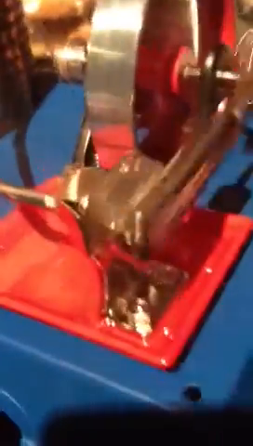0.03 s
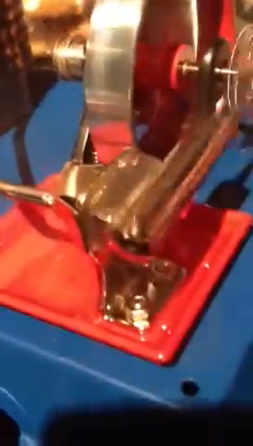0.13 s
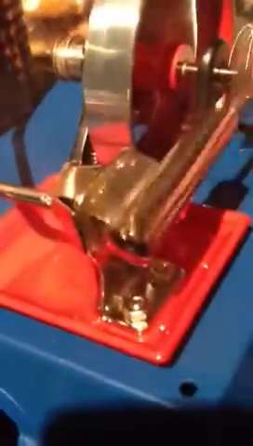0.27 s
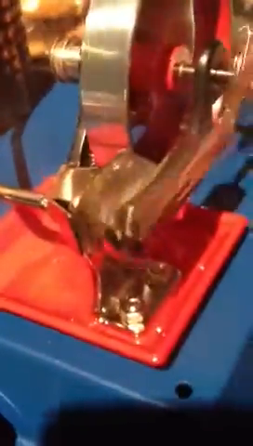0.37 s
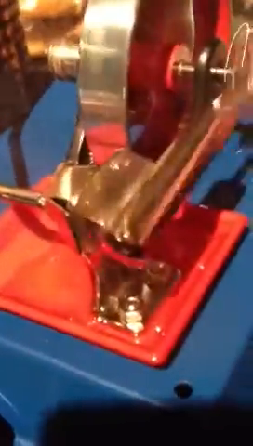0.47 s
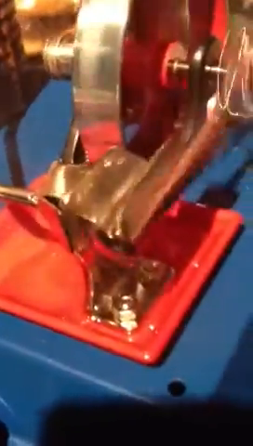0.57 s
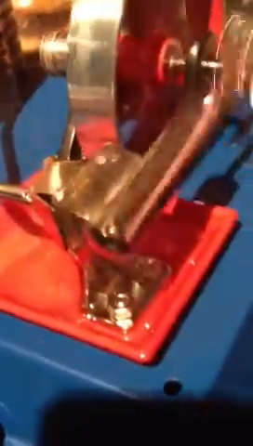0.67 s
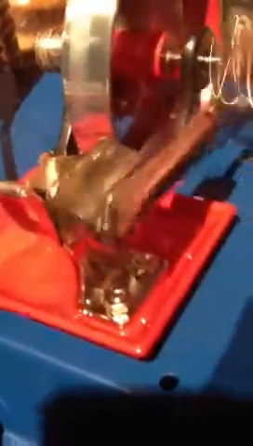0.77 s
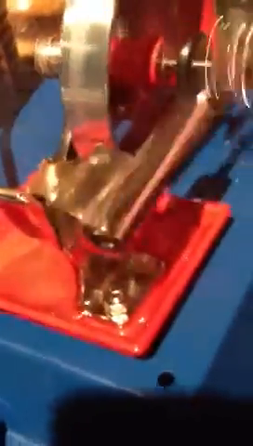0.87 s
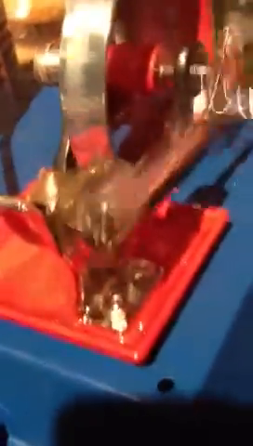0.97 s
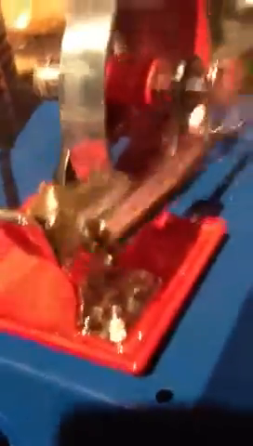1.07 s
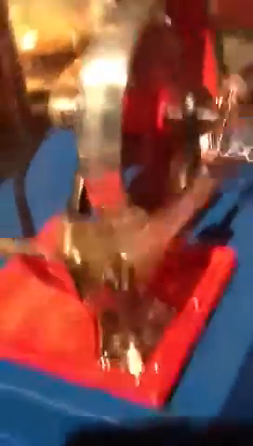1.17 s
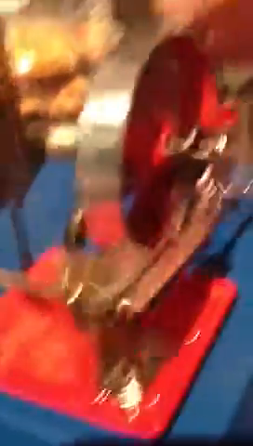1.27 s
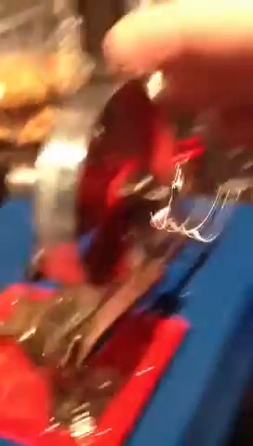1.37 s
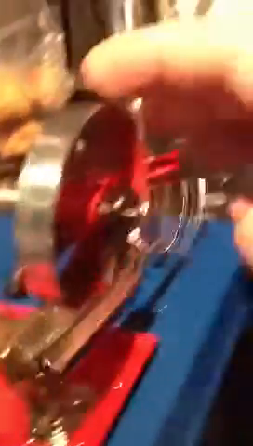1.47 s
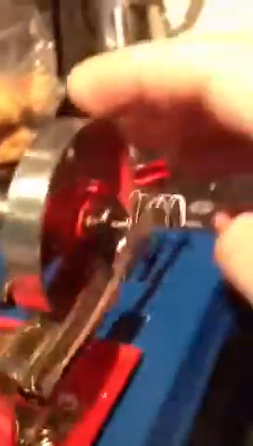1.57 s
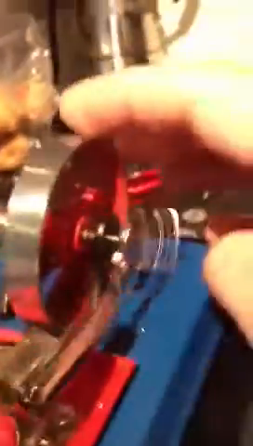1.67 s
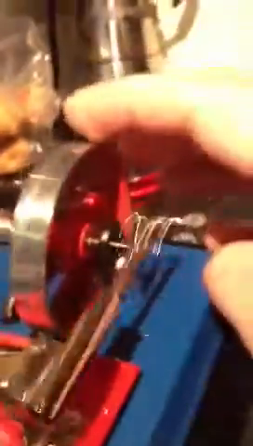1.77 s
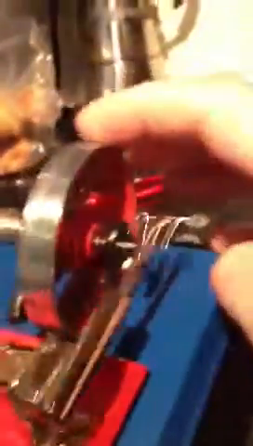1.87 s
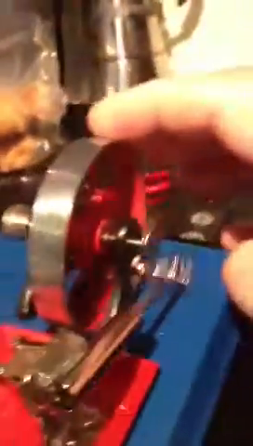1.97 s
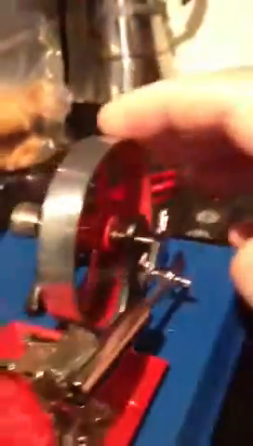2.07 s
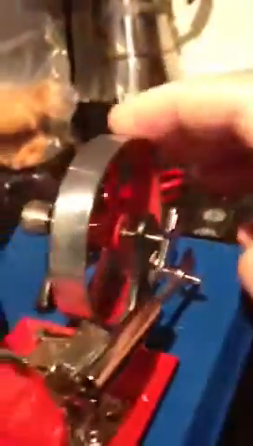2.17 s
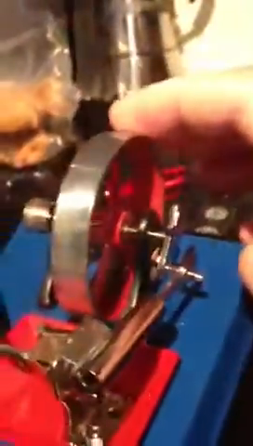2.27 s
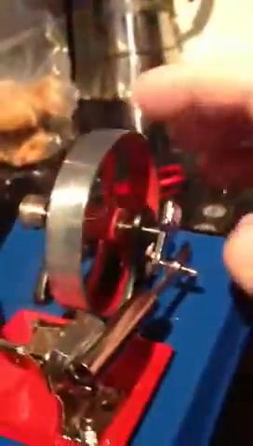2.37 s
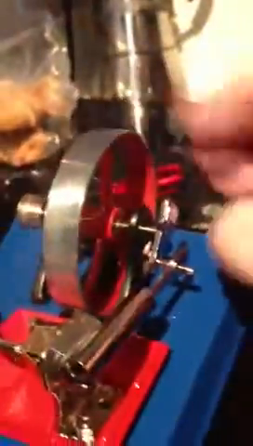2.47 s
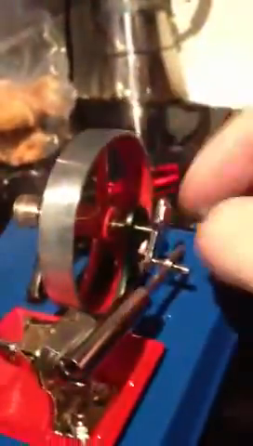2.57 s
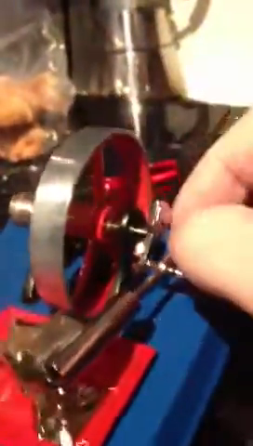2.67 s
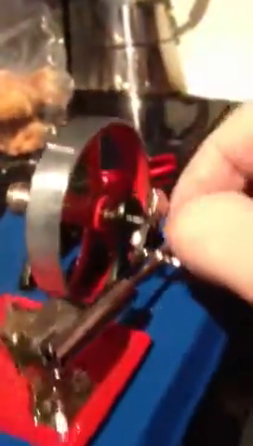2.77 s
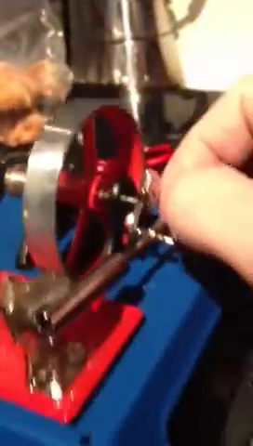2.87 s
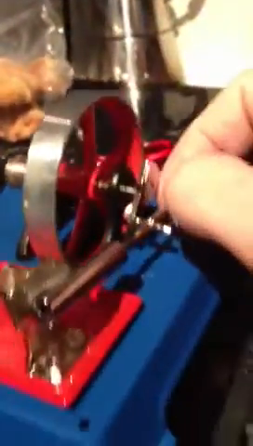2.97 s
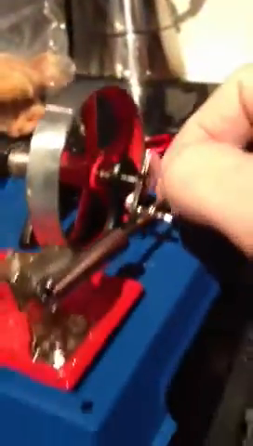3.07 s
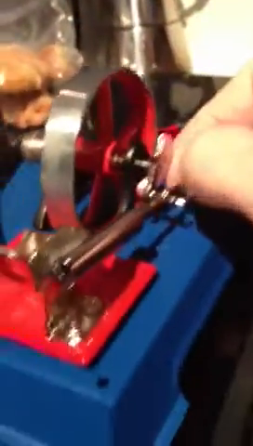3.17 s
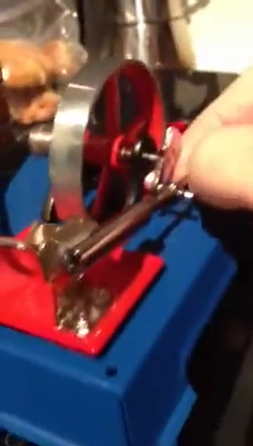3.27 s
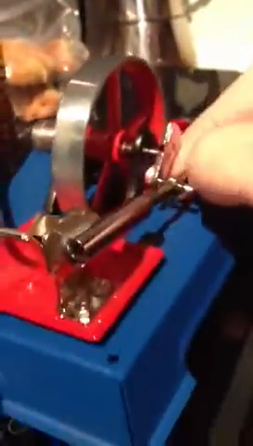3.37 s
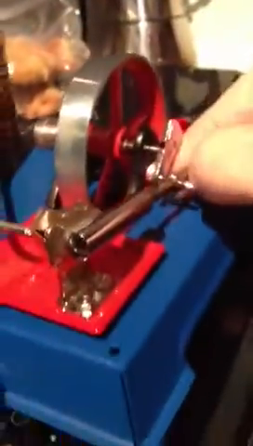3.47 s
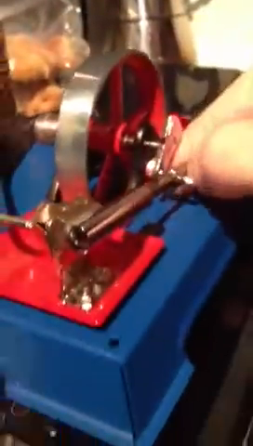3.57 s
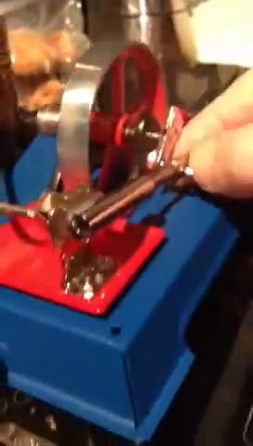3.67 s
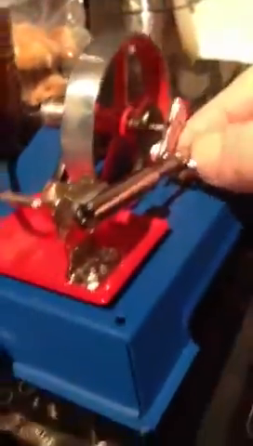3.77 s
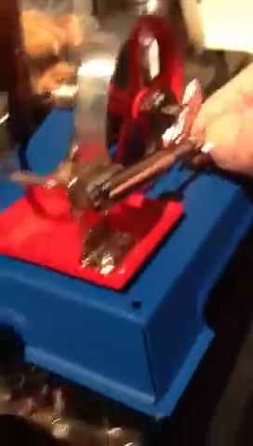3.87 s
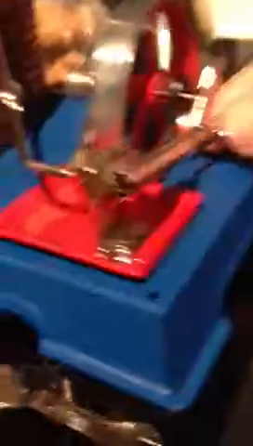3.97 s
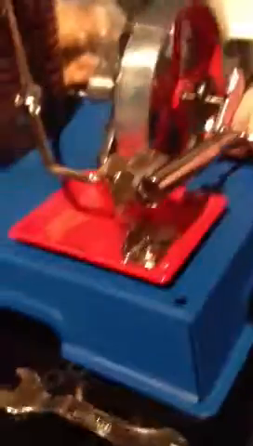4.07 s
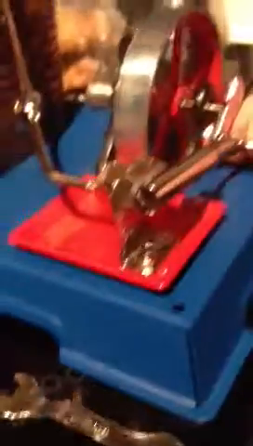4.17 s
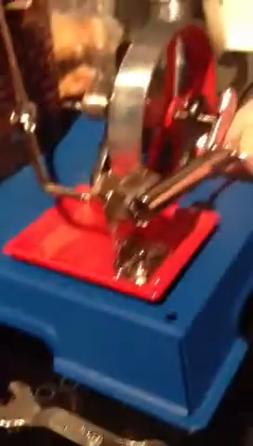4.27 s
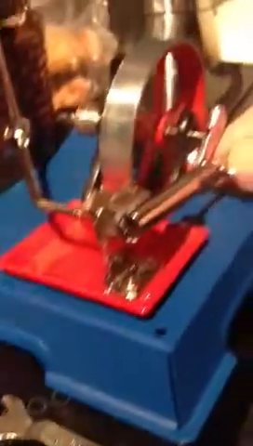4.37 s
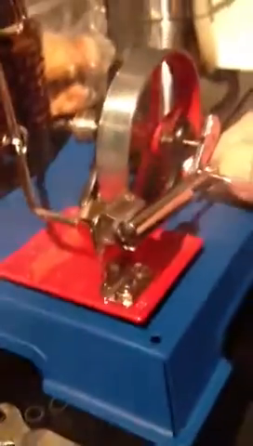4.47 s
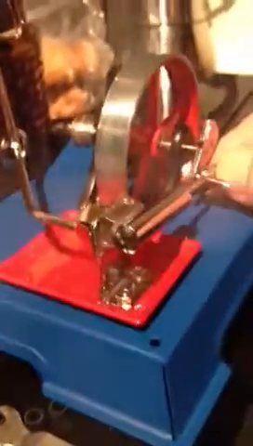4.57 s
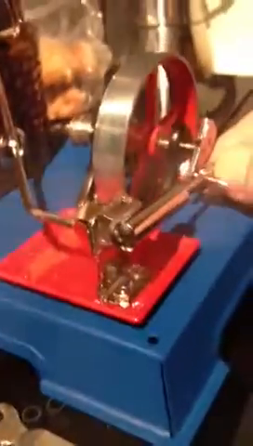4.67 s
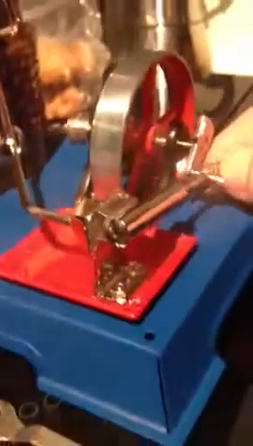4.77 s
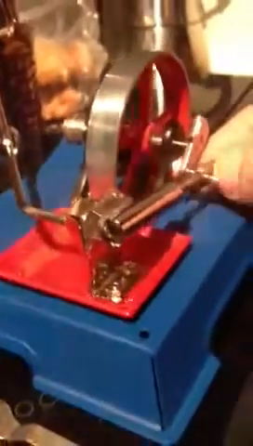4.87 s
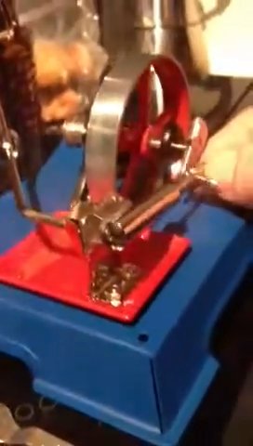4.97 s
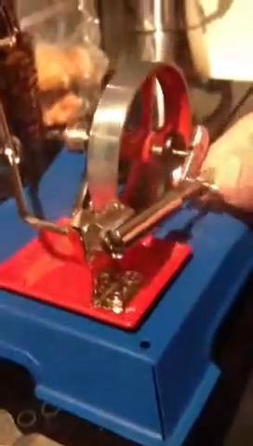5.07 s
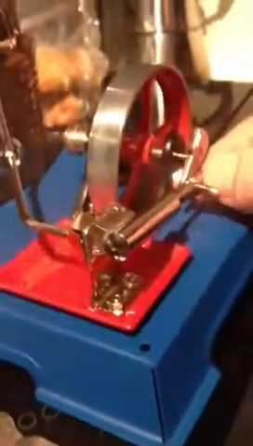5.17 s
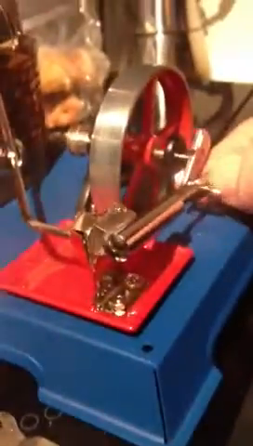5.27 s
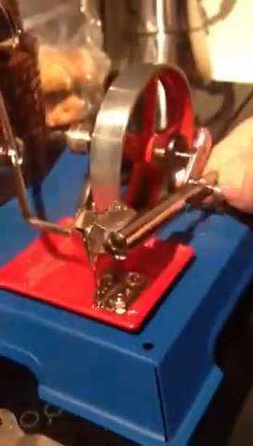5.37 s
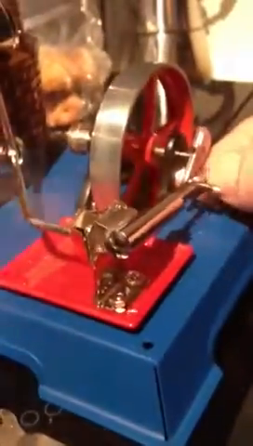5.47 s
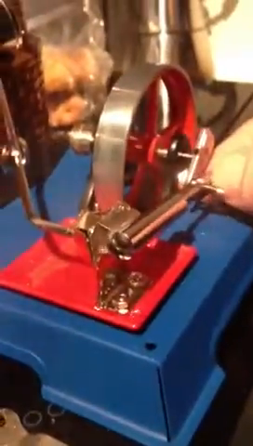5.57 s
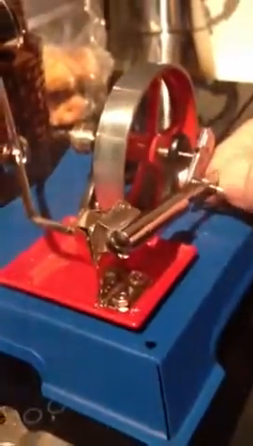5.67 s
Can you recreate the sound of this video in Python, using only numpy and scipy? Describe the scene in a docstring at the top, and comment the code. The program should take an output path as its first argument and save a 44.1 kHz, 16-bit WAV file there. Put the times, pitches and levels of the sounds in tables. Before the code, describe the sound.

A small toy steam engine runs close by, puffing rapidly with a bright, wet hiss and a metallic rattle on every turn. After about two seconds it slows slightly and stops. A few light metal taps and weak spits of steam follow over a thin leaking hiss. Near the end come four loud, sharp bursts of steam with faint clinks between them. The small room hums softly.

```python
"""In a small, humming room, a toy steam engine with an oscillating cylinder runs on its hollow base.
Each turn gives a wet exhaust puff (a turbulent jet), a rub of the piston and a rattling knock (forces
that excite the modes of the frame), until a finger brakes the flywheel to a stop. The crank is then
rocked by hand: it taps in its play, and the open port lets out bursts of spitting steam.
The engine is close by; throughout, its boiler simmers and a thin hiss seeps from the port face."""
import sys
import numpy as np
from scipy import signal
from scipy.fft import rfft, irfft, next_fast_len
from scipy.io import wavfile
from scipy.ndimage import uniform_filter1d, map_coordinates

SR = 44100
rng = np.random.default_rng(int(sys.argv[2]) if len(sys.argv) > 2 else 0)


def persist_wave(psi):
    """Save psi, clipped to +-1, as 16-bit WAV."""
    counts = np.round(np.clip(psi, -1, 1) * 32767).astype(np.int16)
    wavfile.write(sys.argv[1], SR, np.atleast_2d(counts).T)


N = 252693


def amp(db):
    """Decibels as an amplitude ratio."""
    return 10 ** (np.asarray(db) / 20)


def unit(x):
    """Normalisation to rms 1."""
    return x / np.sqrt(np.mean(x ** 2) + 1e-20)


def along(points, hz):
    """Interpolation of (frequency_hz, value) points on a logarithmic frequency axis."""
    f, values = np.transpose(points)
    return np.interp(np.log(hz + 1), np.log(f + 1), values)


def clock():
    """The time of every sample in seconds."""
    return np.arange(N) / SR


def wobble(rate):
    """Smooth random modulation: a spline through `rate` knots a second."""
    knots = rng.standard_normal(int(N * rate / SR) + 4)
    smooth = map_coordinates(knots, [np.arange(len(knots) * 10) / 10])
    return np.interp(clock() * rate * 10, np.arange(len(smooth)), smooth)


def gate(start, end, rise, fall):
    """An envelope at 1 from start to end, with exponential flanks (time constants in seconds)."""
    rise, fall, opening = max(rise, 1e-4), max(fall, 1e-4), np.zeros(N)
    span = np.arange(max(int((start - 10 * rise) * SR), 0), min(int((end + 10 * fall) * SR), N))
    t = span / SR
    opening[span] = np.exp(-np.maximum(start - t, 0) / rise - np.maximum(t - end, 0) / fall)
    return opening


def filtered(x, response):
    """Linear filtering: the spectrum of x times a frequency response."""
    size = next_fast_len(N + SR // 2)
    return irfft(rfft(x, size) * response(np.fft.rfftfreq(size, 1 / SR)), size)[:N]


def crossover(low, high, split_hz):
    """Complementary filters join the bass of one signal to the treble of another."""
    return high + filtered(low - high, lambda f: 1 / (1 + (f / split_hz) ** 8))


def resonances(modes, f):
    """Modal superposition: the summed response of damped (pitch_hz, width_hz, gain_db) resonators."""
    return sum(amp(db) * 1j * f * width / (hz * hz - f * f + 1j * f * width) for hz, width, db in modes)


def narrow_noise(hz, width_hz):
    """Narrow-band noise of rms 1: white noise passed twice through one resonator."""
    return unit(filtered(rng.standard_normal(N), lambda f: resonances([(hz, width_hz, 0)], f) ** 2))


def grains(rate, share):
    """Shot noise of `rate` ticks a second carries a share of the power, Gaussian noise the rest."""
    ticks = rng.uniform(-0.96, 1, N) * (rng.random(N) < rate / SR)
    return np.sqrt(share) * unit(ticks) + np.sqrt(1 - share) * rng.standard_normal(N)


def patchy(x, depth_db):
    """Spectral modulation: random gains in patches a few hundred hertz wide and about a stroke long."""
    spectrogram = signal.stft(x, nperseg=512)[2]
    field = uniform_filter1d(rng.standard_normal(spectrogram.shape), 4, axis=0)
    field = uniform_filter1d(field, 14, axis=1)
    return unit(signal.istft(spectrogram * amp(depth_db * unit(field)), nperseg=512)[1][:N])


# Partials of the room's hum: pitch_hz, relative_level_db
HUM_PARTIALS = [(193.8, -53), (269.2, -60), (489.9, -63)]
def room_hum():
    """Phase and amplitude modulation make three low tones waver."""
    hum = np.zeros(N)
    for hz, db in HUM_PARTIALS:
        tone = np.sin(2 * np.pi * hz * clock() + 0.6 * wobble(12))
        hum += amp(db + 0.5) * unit(tone * amp(2.9 * wobble(7)))
    return hum


# Spectrum of the room's noise: frequency_hz, relative_level_db
RUSH_SPECTRUM = [(25, -52), (60, -46), (100, -14), (150, -8), (190, -1.5), (230, -4), (295, 3.5),
                 (420, -13.5), (600, -9.5), (880, -12.5), (1000, -19.5), (1300, -14), (2600, -21.5),
                 (6000, -45)]
def room_rush():
    """Stationary noise, weighted to low frequencies, is heard as a soft rush."""
    return amp(-48) * unit(filtered(rng.standard_normal(N), lambda f: amp(along(RUSH_SPECTRUM, f))))


# Reverberation time of the room: frequency_hz, t60_s
ROOM_DECAY = [(200, 0.5), (2000, 0.25), (12000, 0.12)]
def reverberation(x):
    """The diffuse field of a small room decays exponentially, faster in the treble."""
    hz, t, spectrogram = signal.stft(rng.standard_normal(SR // 3), SR, nperseg=256)
    decay = amp(-60 * t / along(ROOM_DECAY, hz)[:, None])
    tail = signal.istft(spectrogram * decay, SR, nperseg=256)[1]
    return signal.fftconvolve(x, np.pad(tail / np.linalg.norm(tail), (SR // 300, 0)))[:N]


def early_reflections(x):
    """Comb filtering: echoes from base plate, boiler and table interfere with the direct sound."""
    echoes = [(.0011, -67), (.0029, -33.5), (.0043, -18), (.0062, -23)]  # delay_s, relative_level_db
    reflected = lambda f: sum(amp(db) * np.exp(-2j * np.pi * f * delay) for delay, db in echoes)
    return filtered(x, lambda f: unit(1 + reflected(f)))


# Modes of the frame and hollow base: pitch_hz, width_hz, relative_gain_db
FRAME_MODES = [(256.3, 11.6, -4), (491.3, 17, -6), (595, 34, -8), (721, 29, 1.5), (812, 65, -1.5),
               (910, 77, -14.5), (1132, 95, 2.5), (1289, 42, 3), (1482, 76, -3.5), (1729, 81, 1),
               (1940, 54, -5), (2107, 210, -11), (2266, 73, -8.5), (2645, 65, -8.5), (3060, 270, -15.5),
               (3390, 180, -4.5), (3714, 216, -4), (4040, 140, -6.5), (4275, 200, -6.5), (4554, 190, -5),
               (4780, 28, -34), (6310, 102, -1.5), (6760, 210, -10), (7350, 92, -21), (8100, 270, -27),
               (7700, 230, -12.5)]
# How strongly they radiate: frequency_hz, relative_gain_db
FRAME_RADIATION = [(50, 2), (130, -9), (250, 6), (400, 1.5), (1100, 1), (1800, 1.5), (5000, 2), (5800, 2.5),
                   (8500, 3.5), (9800, -6.5), (12000, -6), (15000, -27)]
def frame(force, bright, split_hz):
    """Forced vibration: `force` drives the frame's modes below the split, `bright` those above."""
    response = lambda f: unit(resonances(FRAME_MODES, f) * amp(along(FRAME_RADIATION, f)))
    return filtered(crossover(force, bright, split_hz), response)


def boiler_simmer():
    """Structure-borne sound: the simmering boiler weakly excites the frame."""
    simmer = grains(rate=150, share=.4) * amp(2.2 * wobble(9))
    return amp(-58.5) * frame(simmer, amp(-24.5) * simmer, split_hz=3000)


# Resonances around port and cylinder: pitch_hz, width_hz, gain_db
PORT_MODES = [(3170, 400, -7.5), (4560, 610, -8), (5970, 780, -9), (8080, 210, -10), (9550, 230, -18),
              (12000, 140, -31), (12000, 190, -15)]
def steam(spectrum, spit_rate, spit_share):
    """Jet noise of rms 1: turbulence and bursting droplets, coloured by the port's resonances."""
    colour = lambda f: amp(along(spectrum, f)) * (1 + resonances(PORT_MODES, f))
    return unit(filtered(grains(spit_rate, spit_share), colour))


# Strength of the leak at the port face: time_s, level_db
LEAK_LEVELS = [(0, -68.5), (1.9, -48), (2.05, -51.5), (4.05, -50), (4.22, -42), (4.31, -45), (4.38, -39),
               (4.8, -49), (5.73, -49)]
# Spectrum of seeping steam: frequency_hz, relative_level_db
SEEP_SPECTRUM = [(1000, -17.5), (4000, -5), (5400, -9), (7500, -3), (10500, -4), (11900, 2), (13000, -2),
                 (13700, -6), (15300, -4)]
# Squeaks of wet steam in the gap: start_s, length_s, start_hz, end_hz, level_db
GAP_SQUEAKS = [(3.9, .025, 12200, 11850, -56), (4.195, .06, 11300, 12450, -53)]
def port_leak():
    """Flow through a narrow gap hisses; it squeaks and whistles faintly as the gap widens."""
    level_db = np.interp(clock(), *np.transpose(LEAK_LEVELS))
    hiss = amp(level_db + 0.46 * wobble(14)) * steam(SEEP_SPECTRUM, spit_rate=1300, spit_share=.08)
    squeaks = np.zeros(N)
    for start, length, start_hz, end_hz, db in GAP_SQUEAKS:
        pitch_hz = np.interp(clock(), [start, start + length], [start_hz, end_hz]) + 60 * wobble(150)
        tone = np.sin(2 * np.pi * np.cumsum(pitch_hz) / SR)
        squeaks += amp(db) * gate(start, start + length, rise=.005, fall=.005) * tone
    whistle = amp(-61) * gate(3.83, 4.3, rise=0.061, fall=0.032) * narrow_noise(hz=2550, width_hz=420)
    return hiss + squeaks + whistle


def bearing_rumble():
    """Bearing friction: the flywheel's shaft rumbles until it is braked."""
    rolling = gate(0, 1.89, rise=.01, fall=0.13) * grains(rate=460, share=0.13)
    # frequency_hz, relative_level_db
    spectrum = [(25, -19), (80, -34), (160, -5), (280, -7.5),
                (420, -11.5), (780, -9), (1500, -7), (4000, -21)]
    return amp(-37.5) * filtered(rolling, lambda f: unit(amp(along(spectrum, f))))


def frame_ping():
    """Free vibration: a light tap leaves the frame ringing briefly on one faint, high note."""
    start_s, pitch_hz, level_db, t60_s = 2.62, 1916, -45, .15
    age = np.maximum(clock() - start_s, 0)
    return amp(level_db - 60 * age / t60_s) * np.sin(2 * np.pi * pitch_hz * age)


# The wheel stalls, then fingers nudge it and the crank:
# start_s, relative_level_db, relative_treble_db, length_s
TOUCHES = [(2, -23.5, -18, .012), (2.067, -31, -12, .006), (2.141, -40, 0, .0069), (2.49, -36, -32, .022),
           (2.615, -34, -7, 0.011), (2.726, -33.5, -10.5, 0.012), (3.088, -39, -32, 0.058),
           (3.277, -22, -18, 0.0094), (3.51, -29.5, -17, .003)]
def finger_taps():
    """Contact excitation: each light touch is a brief scrape that rings the frame."""
    force, bright = np.zeros((2, N))
    for start, db, treble_db, length in TOUCHES:
        touch = amp(db - 14) * gate(start + 0.00067, start + length, rise=0.0017, fall=0.01)
        force += touch
        bright += touch * amp(min(treble_db + 5, 0))
    contact = grains(rate=820, share=1.0)
    return frame(force * contact, bright * contact, split_hz=3000)


# The rocked crank reaches the end of its play: start_s, relative_level_db
CRANK_IMPACTS = [(4.751, -32), (4.813, -44.5), (5.06, -30.5), (5.143, -34.5), (5.42, -27)]
# Modes of the piston rod and cylinder: pitch_hz, relative_level_db, t60_s
ROD_MODES = [(1098, -10, 0.15), (1149, -4, 0.061), (1300, -7, 0.093), (1770, -16, 0.033), (4650, 1, .03),
             (4700, -10, .035)]
def crank_clinks():
    """Backlash impact: the crank pin ticks and rings the rod's modes, at new strengths each time."""
    ring, contact = np.zeros((2, N))
    for start, db in CRANK_IMPACTS:
        age = np.maximum(clock() - start, 0)[:round((start + .2) * SR)]
        attack = 1 - np.exp(-age / 0.0017)
        for hz, mode_db, t60 in ROD_MODES:
            decay = amp(db + mode_db + rng.normal(0, 0.82) - 60 * age / t60)
            ring[:len(age)] += attack * decay * np.sin(2 * np.pi * hz * age)
        contact += amp(db - 12) * gate(start + .001, start + .003, rise=0.0006, fall=0.023)
    scrape = contact * grains(rate=1000, share=0.31)
    return ring + frame(amp(-2) * scrape, scrape, split_hz=5200)


# The engine's treble falls as the microphone draws back: time_s, gain_db
TREBLE_FADE = [(0, -.3), (.65, -1), (1.1, -1.1), (1.3, -2.5), (1.75, -3.5), (1.93, -5)]
def strokes(phase):
    """Steady rotation, then uniform braking: (time_s, speed 0-1, treble_db) at each pass of a phase."""
    first_exhaust_s, turn_s = .066, .1073
    brake_s, time_to_rest_s, stall_s = 1.661, 1.14, 1.97  # the wheel stalls before braking is complete
    unbraked_s = first_exhaust_s + turn_s * (np.arange(-1, stall_s / turn_s) + phase)
    speed = np.sqrt(np.clip(1 - 2 * (unbraked_s - brake_s) / time_to_rest_s, 0, 1))
    times = np.minimum(unbraked_s, brake_s) + time_to_rest_s * (1 - speed)
    treble_db = np.interp(times, *np.transpose(TREBLE_FADE))
    return np.transpose([times, speed, treble_db])[(times > 0) & (times < stall_s)]


# Strokes on which the linkage slams home: stroke_number
SLAM_STROKES = [0, 4, 9, 11, 13, 14, 17]
def piston():
    """Friction and impact: the piston rubs, the inlet leaks a wisp, the linkage strikes and chatters."""
    inlet_phase, knock_db = .574, -25  # phase in turns after the exhaust
    force, bright, wisp, rub = np.zeros((4, N))
    for stroke, (inlet_s, _, treble_db) in enumerate(strokes(inlet_phase)):
        strike_db, rise = (3.5, 0.0011) if stroke in SLAM_STROKES else (-3.5, 0.0038)
        strength = amp(strike_db + rng.normal(0, 2))
        strike = strength * gate(inlet_s + 0.0014, inlet_s + 0.0036, rise=rise / 2, fall=.002)
        rattle = gate(inlet_s + 0.0025, inlet_s + 0.013, rise=rise, fall=.015)
        knock = amp(knock_db) * np.maximum(strike, rattle)
        force += knock * amp(0.51 * treble_db)
        bright += knock * amp(treble_db - 1.95)
        rub += amp(-34.5) * gate(inlet_s - .022, inlet_s - .012, rise=0.0072, fall=0.011)
        wisp += amp(treble_db - 26.5) * gate(inlet_s - .0035, inlet_s + .0022, rise=.0014, fall=0.0088)
    # the contact point shifts from stroke to stroke and favours other modes
    chatter = patchy(grains(rate=1200, share=.38), depth_db=2.3)
    sliding = rub * grains(rate=1800, share=0.39)
    metal = frame(force * chatter + sliding, bright * chatter + amp(-6.5) * sliding, split_hz=4400)
    return metal + wisp * steam(SEEP_SPECTRUM, spit_rate=2400, spit_share=0.18)


# Openings of the standing engine's port: open_s, close_s, rise_s, level_db
PORT_OPENINGS = [(3.242, 3.255, .003, -46), (3.523, 3.601, 0.014, -37), (3.748, 3.752, 0.0027, -43.5),
                 (3.807, 3.902, .019, -47.5), (4.419, 4.732, 0.012, -18.5), (4.933, 5.051, 0.0092, -22),
                 (5.13, 5.281, 0.0065, -22.4), (5.434, 5.633, .0032, -23)]
# Spectrum of the jet through the open port: frequency_hz, relative_level_db
BURST_SPECTRUM = [(150, -38), (600, -20), (1200, -18), (2500, -12), (3300, -8.5), (5400, -9), (6500, -3.5),
                  (10400, -4), (11700, 1.5), (12900, 2), (14000, -3.5), (15300, -4.5)]
def steam_bursts():
    """Discharge under pressure: the boiler blows through the open port, and the jet sags as it does."""
    sag_db_per_s, shut_s = 12.5, 0.0081
    flow = np.zeros(N)
    for opens, closes, rise, db in PORT_OPENINGS:
        blown_s = np.clip(clock() - opens, 0, closes - opens)
        flow += amp(db - sag_db_per_s * blown_s) * gate(opens, closes, rise, shut_s)
    sputter = amp(.35 * wobble(25) + .8 * wobble(400))
    # condensed water chokes a port that is barely open and makes it flutter
    flutter = amp(2.5 * wobble(110) / (1 + (flow / amp(-36)) ** 2))
    jet = sputter * flutter * steam(BURST_SPECTRUM, spit_rate=260, spit_share=0.15)
    # the edge of the port sings most at the highest flow
    edge_tone = amp(-18.5) * (flow / flow.max()) * narrow_noise(hz=7700, width_hz=49)
    return flow * (jet + edge_tone)


# Spectrum of the exhaust jet: frequency_hz, relative_level_db
PUFF_SPECTRUM = [(100, -43), (600, -32), (2500, -19.5), (4000, -11), (5400, -15.5), (6500, -8.5),
                 (8400, -4.5), (10300, -3.5), (11700, 3.5), (12900, 1), (14000, -5), (15300, -11)]
def exhaust_puffs():
    """A pulsed jet: the port opens as a thin slit, so the treble leads; the piston sweeps out the rest."""
    puff_db, scatter_db, full_speed_open_s = -17, .5, 0.013
    slit, wide = np.zeros((2, N))
    for opens, speed, treble_db in strokes(phase=0):
        size = amp(puff_db + treble_db + rng.normal(0, scatter_db))
        closes = opens + full_speed_open_s / speed
        sweep = amp(-25) * gate(opens + .04, opens + .056, rise=.007, fall=.008)
        slit += size * (gate(opens + 0.0017, closes - .001, rise=0.00093, fall=.0085 / speed) + sweep)
        wide += size * amp(0.6) * gate(opens + 0.0055, closes + 0.0044, rise=0.0023, fall=.0095 / speed)
    jet = steam(PUFF_SPECTRUM, spit_rate=1400, spit_share=0.15)
    return crossover(wide * jet, slit * jet, split_hz=8100)


def scene():
    """Superposition of the nearby engine, its reflections and the background, in one channel."""
    jets = exhaust_puffs() + steam_bursts() + port_leak()
    mechanism = piston() + bearing_rumble() + finger_taps() + frame_ping() + crank_clinks()
    engine = early_reflections(jets + mechanism)
    reverberant = amp(-17) * reverberation(engine)
    background = room_hum() + room_rush() + boiler_simmer()
    return (engine + reverberant + background)[None]


def record(dry):
    """Band limiting: the small microphone loses the deep bass, and the recorder cuts the top treble."""
    bass_hz, top_hz = 55, 15350
    response = lambda f: (f < top_hz) * (1j * f / (bass_hz + 1j * f)) ** 2
    return np.array([filtered(channel, response) for channel in dry])


dry = scene()
out = record(dry)
persist_wave(out)
```